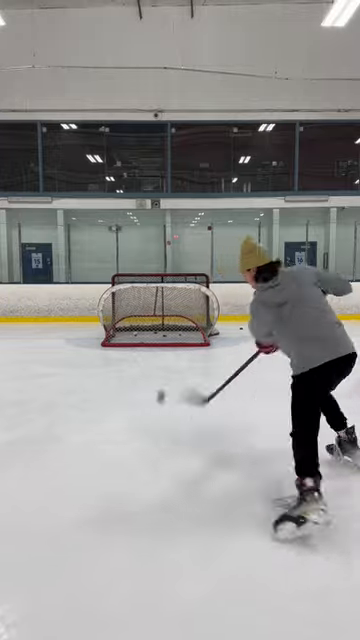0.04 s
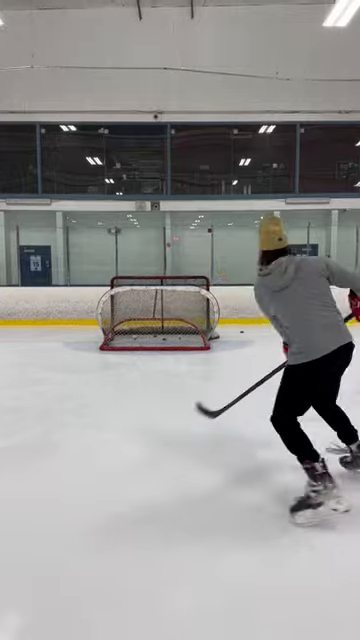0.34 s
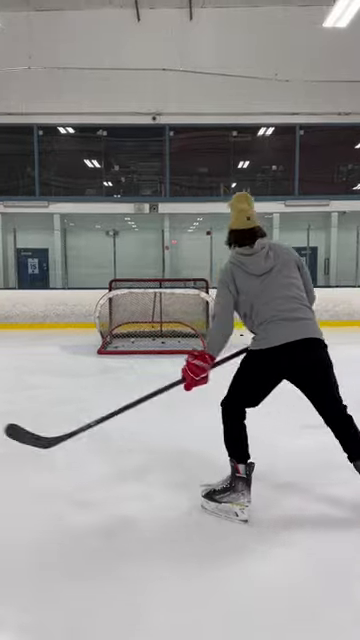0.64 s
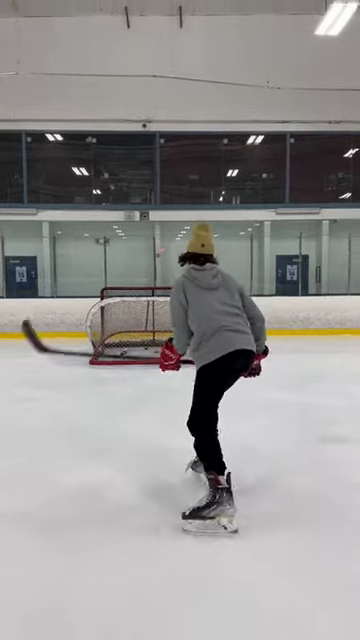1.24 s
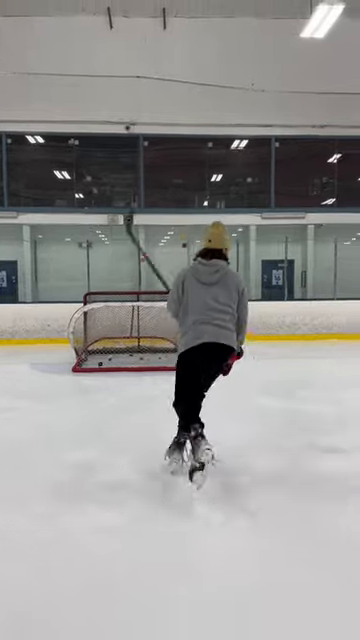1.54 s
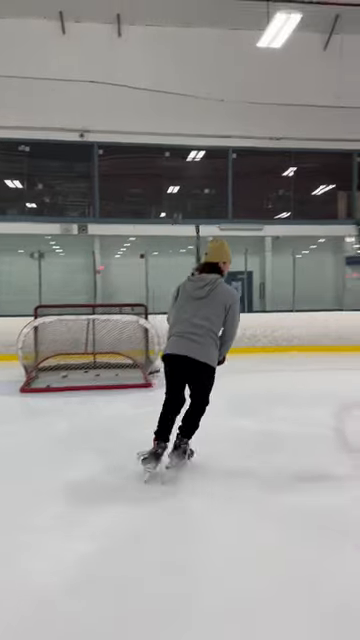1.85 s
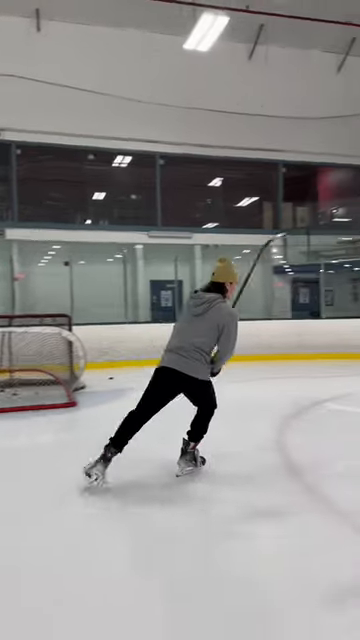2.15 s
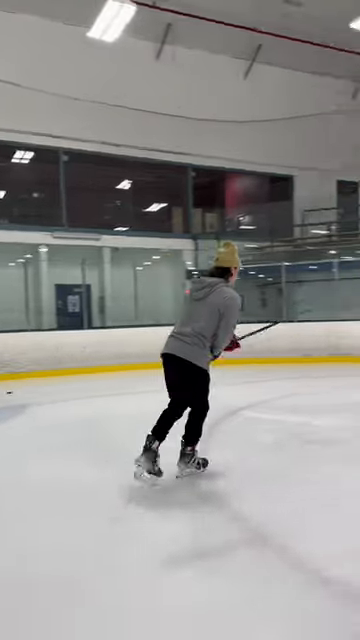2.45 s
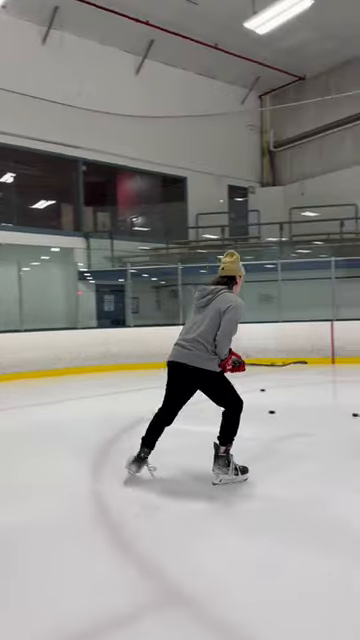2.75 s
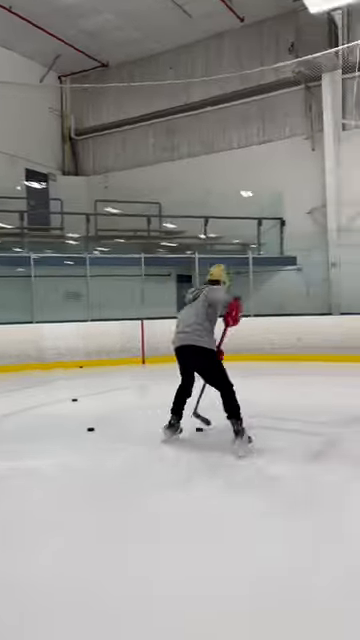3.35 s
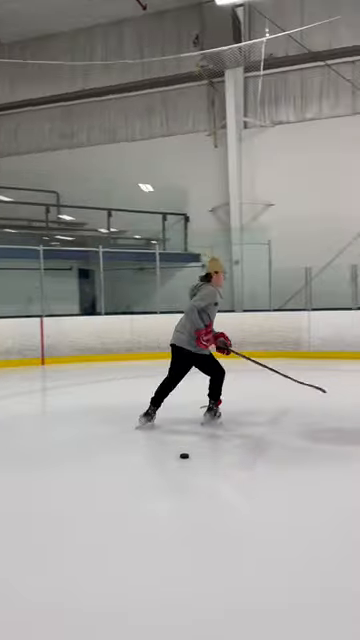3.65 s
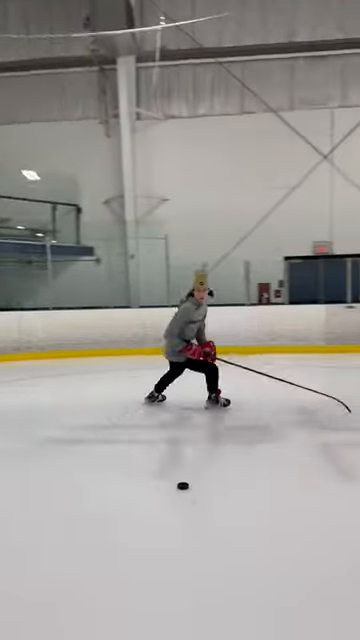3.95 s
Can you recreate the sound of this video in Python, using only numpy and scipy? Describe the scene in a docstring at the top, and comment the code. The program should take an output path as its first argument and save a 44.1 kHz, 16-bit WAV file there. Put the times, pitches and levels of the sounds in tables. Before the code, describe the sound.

A puck hits a steel goal post at about 0.2 seconds with a bright ping, amid bangs on the boards and the echo of a shot. The ringing fades through the rink. From 1.6 seconds skate blades clack and scrape on the ice. A stick snaps another puck at about 3.2 seconds, and skating continues to 4 seconds as a low machinery hum grows louder.

```python
"""Puck off the post in an ice rink

A hard shot is still echoing when the puck sets the steel goal post ringing and bangs into the boards.
The ping reflects from the far walls while the player skates off, blades clacking on the ice and
chipping it, and snaps a second puck away with the stick. Each impact excites the hall's reverberation.
The rink's machinery hums underneath, louder as the player moves on."""
import sys
import numpy as np
from scipy import signal
from scipy.fft import rfft, irfft
from scipy.io import wavfile

SR = 44100
rng = np.random.default_rng(int(sys.argv[2]) if len(sys.argv) > 2 else 0)


def dump_mix(stems):
    """Bounce the given channels to the path in sys.argv[1] as a 16-bit WAV at rate SR."""
    frames = np.atleast_2d(stems).T  # one column per channel
    limited = np.clip(frames, -1, 1)  # hard clip at full scale
    pcm = np.round(limited * 32767).astype(np.int16)
    wavfile.write(sys.argv[1], SR, pcm)


N = 176400
T = np.arange(N) / SR

# modes of the steel post: f/Hz, level/dB, T60/s
POST_MODES = [(744, -24, 2.0), (1060, -28, 1.2), (1324, -22, 1.0), (1572, -28, .9), (2019, -21, .6),
              (2157, -7, .22), (2248, 0, .23), (2287, -7, .25), (2677, -24, .4), (6308, -12.5, .12),
              (6344, -16, .12)]
# scattering by glass and boards: delay/s, decay time/s, level/dB
POST_SCATTER = [(.012, .04, -15)]
# wall echoes: delay/s, level/dB
POST_ECHOES = [(.123, -4), (.368, -11), (.395, -11), (.435, -13), (.487, -17), (1.83, -28)]
def goal_post(hall, strike_s=.2325, echo_cutoff_hz=2600):
    """Free vibration: the struck tube rings in its modes, and the walls reflect a duller ping."""
    ping = delayed(from_db(-17.5) * ring(POST_MODES, T), strike_s)
    flutter = scattered(ping, POST_SCATTER)
    far = dull(ping + flutter, echo_cutoff_hz)
    echoes = sum(from_db(db) * delayed(far, s) for s, db in POST_ECHOES)
    # the ping swells faintly again about 1.6 s after the blow
    late_response = from_db(-25.5) * rms_one(rng.standard_normal(N) * swell(1.59, .23)) / np.sqrt(N)
    late_swell = signal.fftconvolve(far, late_response)[:N]
    tail = reverberation(dull(ping, echo_cutoff_hz), hall, wet_db=-1)
    return direct(ping + flutter + echoes + late_swell) + tail


# ticks: t/s, half-width/s, level/dB
TICKS = [(0.2325, 0.002, -41.5), (.434, .0006, -41.5), (1.6006, 0.00092, -52)]
# their spectrum: f/Hz, level/dB
TICK_SPECTRUM = [(3000, -15), (7000, -1), (15000, -16)]
def ticks():
    """Brief transients are broadband: bright, dry ticks, the first as the puck meets the steel."""
    return noise(TICK_SPECTRUM) * bursts(TICKS)


# bangs on boards and glass, and their wall echoes: t/s, level/dB, decay time/s, cutoff/Hz
BANGS = [(.006, -18.5, 0.0059, 9300), (.019, -28.5, 0.0053, 9000), (0.123, -29, 0.034, 4770),
         (0.213, -19.5, 0.0059, 1600), (0.231, -28.5, 0.081, 9100), (0.297, -27.5, 0.023, 2000),
         (0.358, -24.5, 0.021, 3080), (0.414, -28.5, 0.038, 2770), (0.723, -27.5, 0.057, 1090)]
# panel spectrum: f/Hz, level/dB
PANEL_SPECTRUM = [(100, -12), (800, -8.5), (1350, 0), (1900, -10.5), (2700, -5.5), (4200, -17.5),
                  (7500, -20), (11000, -55.5)]
def boards(hall):
    """Damped vibration: distant panels rattle at each bang and decay exponentially."""
    rattle = noise(PANEL_SPECTRUM)
    bangs = sum(dull(rattle * delayed(from_db(db) * np.exp(-T / decay), s), hz)
                for s, db, decay, hz in BANGS)
    return in_hall(bangs, hall, wet_db=1)


# stick meets puck and ice: t/s, level/dB, cutoff/Hz
STICK_HITS = [(3.2243, -17, 2540), (3.2258, -6, 5400), (3.2295, -13, 2040), (3.2368, -19.5, 4000)]
# modes of the stick blade: f/Hz, level/dB, T60/s
STICK_MODES = [(564, -17.5, 0.011), (960, -9.5, 0.013), (1665, -4, 0.0088), (2257, -5, 0.0087),
               (3130, 0.5, 0.002), (4520, -16, 0.0067), (5820, -18, 0.016), (7540, -17.5, 0.012),
               (9250, -15, 0.0032)]
# the blade skims the ice: t/s, half-width/s, level/dB
SKIMS = [(3.190, 0.0043, -37), (3.2377, 0.0017, -29.5)]
# skim spectrum: f/Hz, level/dB
SKIM_SPECTRUM = [(500, -15), (1600, 12), (4000, -5.5), (5800, 3), (8000, 4), (15000, -36)]
# reflections from the boards: delay/s, decay time/s, level/dB
BOARD_SLAPS = [(0.036, 0.012, -9), (0.066, .03, -13.5)]
def stick(hall):
    """Impact excitation: the blade skims the ice and rings against the puck; the boards slap back."""
    knocks = blows(STICK_HITS, STICK_MODES, spread_db=2.5)
    snap = knocks + noise(SKIM_SPECTRUM) * bursts(SKIMS)
    return in_hall(snap, hall, wet_db=-1) + direct(scattered(snap, BOARD_SLAPS))


# a skate edge bites: t/s, half-width/s, level/dB, high-pass cutoff/Hz
SCRAPES = [(1.613, 0.009, -37, 650), (2.035, 0.035, -37.5, 800), (2.485, 0.034, -43, 254),
           (2.716, 0.028, -33, 1340), (3.058, 0.011, -34, 1350), (3.404, 0.025, -38, 590),
           (3.89, 0.06, -34, 614), (3.99, 0.047, -30.5, 353)]
# scrape spectrum: f/Hz, level/dB
SCRAPE_SPECTRUM = [(450, 2), (1500, 0), (2350, -5.5), (3100, -26), (7500, -37), (11000, -60)]
def scrapes(chips_per_s=1000):
    """Brittle fracture: ice chips break off under the edge as random impulses over a hiss."""
    chips = (rng.random(N) < chips_per_s / SR) * rng.choice([-1, 1], N)
    strengths = from_db(2.5 * np.minimum(rng.exponential(1, N), 4))
    hiss = 0.46 * rng.standard_normal(N)
    crunch = rms_one(colour(rms_one(chips * strengths) + hiss, SCRAPE_SPECTRUM))
    return sum(from_db(db) * swell(s, half) * thin(crunch, hz) for s, half, db, hz in SCRAPES)


# a blade is set down: t/s, clack level/dB, cutoff/Hz, thud level/dB
CLACKS = [(1.6, -20.5, 2600, -41), (1.856, -28, 2000, -33), (1.8943, -22.5, 2200, -43),
          (1.9428, -17.5, 1700, -40), (2.437, -18.5, 1600, -28), (2.467, -29, 1800, -36),
          (2.500, -27, 2800, -33), (2.816, -26.5, 4500, -39), (3.011, -20, 3400, -27),
          (3.061, -25.5, 3000, -28), (3.352, -15, 2000, -34), (3.362, -21.5, 2000, -42),
          (3.465, -16.5, 1900, -29)]
# modes of blade holder and boot (clack) and boot alone (thud): f/Hz, level/dB, T60/s
SKATE_MODES = [(650, -8, 0.0056), (827, -5, 0.012), (1293, -7.5, 0.013), (1546, -10.5, 0.015),
               (2160, -14.5, 0.015), (2600, -12.5, 0.0059), (3700, -10.5, 0.0031)]
BOOT_MODES = [(441, 0.013, 0.028)]
def strides(hall, pan_db=0.53):
    """Heavily damped modes: each skate lands with a clack and a thud, amid the scrapes of its edge."""
    clacks = blows([row[:3] for row in CLACKS], SKATE_MODES, spread_db=1.5)
    thuds = sum(delayed(from_db(db) * ring(BOOT_MODES, T), s) for s, _, _, db in CLACKS)
    return in_hall(clacks + thuds + scrapes(), hall, wet_db=-8) * from_db([[pan_db], [-pan_db]])


# glide envelope: t/s, level/dB
GLIDE_LEVEL = [(0, -66.5), (2.2, -59), (2.55, -55.5), (3.7, -51.5), (4, -47)]
# glide spectrum: f/Hz, level/dB
GLIDE_SPECTRUM = [(400, -2), (1500, 15), (4200, 5), (7500, 3), (10000, -9), (12000, -72), (15000, -21)]
def glide():
    """Sliding friction: the blades draw a growing hiss from the ice."""
    return level(GLIDE_LEVEL) * diffuse(GLIDE_SPECTRUM)


# starting spectrum of the earlier shot's tail: f/Hz, level/dB
SHOT_SPECTRUM = [(100, -33), (300, -14), (750, -7), (1330, 1.5), (1800, -5.5), (2600, -5), (4000, -14.5),
                 (7000, -14), (9000, -21), (11000, -54.5)]
def earlier_shot():
    """Reverberant decay: the sound of a hard shot lingers as a diffuse field."""
    return from_db(-31) * dying(diffuse(SHOT_SPECTRUM))


# ventilation spectrum: f/Hz, level/dB
AIR_SPECTRUM = [(20, -38), (45, 0), (184, -3.5), (532, -8), (1350, -17.5), (2250, -23.5), (4000, -39),
                (9000, -73)]
# partials of the low drone and the higher mains hum: f/Hz, level/dB, waver depth (0-1)
DRONE_PARTIALS = [(74.4, -2, 0.78), (90.2, -6, 0.66), (119.7, -7.5, 0)]
HUM_PARTIALS = [(240.1, -1, 0.14), (296.8, -15.5, 1)]
# envelopes of the three: t/s, level/dB
AIR_LEVEL = [(1.4, -45), (2.6, -44), (3.5, -41), (4, -39)]
DRONE_LEVEL = [(0, -52), (1.3, -48.5), (2.8, -46.5), (3.5, -38), (4, -38)]
HUM_LEVEL = [(0, -49.5), (1.6, -49.5), (2.0, -42), (3.0, -39.5)]
def machinery():
    """Superposition: the plant's broadband air rush adds to its tonal drone and mains hum."""
    air = level(AIR_LEVEL) * diffuse(AIR_SPECTRUM)
    drone = level(DRONE_LEVEL) * tones(DRONE_PARTIALS)
    hum = level(HUM_LEVEL) * tones(HUM_PARTIALS)
    return air + drone + hum


# reverberation time of the hall: f/Hz, T60/s
HALL_T60 = [(150, 2.2), (750, 7.16), (1400, 3.86), (2500, 3.89), (4500, 1.8), (8000, 1.07)]
def dying(x):
    """Absorption depends on frequency: each half-octave decays at its own rate."""
    spectrum, f = rfft(x), np.fft.rfftfreq(N, 1 / SR)
    centres = np.geomspace(150, 9600, 13)
    bands = (irfft(spectrum * at_hz(np.c_[centres, share], f), N) for share in np.eye(len(centres)))
    return sum(band * from_db(-60 * T / at_hz(HALL_T60, hz)) for hz, band in zip(centres, bands))


def hall_response(build_s=0.0038):
    """Impulse response of the hall: a diffuse field builds up quickly, then decays."""
    field = dying(diffuse([(6000, 5), (14000, -13)])) * (1 - np.exp(-T / build_s))
    return from_db(-4.5) * rms_one(field) / np.sqrt(N)


def reverberation(x, hall, wet_db):
    """Convolution with the hall's impulse response gives a sound its tail."""
    return from_db(wet_db) * signal.fftconvolve(x[None], hall, axes=1)[:, :N]


def in_hall(x, hall, wet_db):
    """Direct and reverberant fields add."""
    return direct(x) + reverberation(x, hall, wet_db)


def scattered(x, rows):
    """Scattering: dense clusters of reflections, each decaying after its delay."""
    envelope = sum(delayed(from_db(db) * np.exp(-T / decay) * np.sqrt(2 / (decay * SR)), s)
                   for s, decay, db in rows)
    return signal.fftconvolve(x, rng.standard_normal(N) * envelope)[:N]


# stereo width of diffuse sound: f/Hz, side-to-mid level/dB
DIFFUSE_WIDTH = [(250, -25), (700, -8), (1100, -9.5), (1800, -14.5), (2800, 1.5), (5500, -5), (9000, 0),
                 (11000, 25)]
def diffuse(spectrum):
    """Diffuse field: noise from all around is partly coherent between channels."""
    mid, side = rms_one(colour(rng.standard_normal((2, N)), spectrum))
    return mid + colour(side, DIFFUSE_WIDTH) * [[1], [-1]]


# stereo width of a source ahead: f/Hz, side-to-mid level/dB
DIRECT_WIDTH = [(2150, -27), (3000, -5.5), (7000, -5.5), (11000, 19.5)]
def direct(x):
    """Phase difference: a side signal in quadrature parts the channels towards the treble."""
    return x + colour(x, DIRECT_WIDTH, 1j) * [[1], [-1]]


def ring(modes, t, spread_db=0):
    """Modal superposition: damped sinusoids of alternating sign, levels varied by spread_db."""
    offsets_db = spread_db * rng.standard_normal(len(modes))
    return sum((-1) ** k * from_db(db + offsets_db[k] - 60 * t / t60) * np.sin(2 * np.pi * hz * t)
               for k, (hz, db, t60) in enumerate(modes))


def blows(rows, modes, spread_db):
    """Contact acts as a low-pass filter: softer knocks on a body are duller."""
    return sum(delayed(from_db(db) * dull(ring(modes, T[:SR // 8], spread_db), hz), s)
               for s, db, hz in rows)


def tones(partials):
    """Random modulation: steady tones waver in amplitude and phase."""
    total = np.zeros(N)
    for hz, db, waver in partials:
        modulation = 1 + waver * (drift(9) + 1j * drift(6.2))
        carrier = np.exp(2j * np.pi * (hz * T + rng.random()))
        total += from_db(db) * np.real(modulation * carrier)
    return direct(total)


def drift(knots_per_s):
    """Slow fluctuation between Gaussian random values."""
    knots = rng.standard_normal(400)
    return np.interp(T * knots_per_s, np.arange(len(knots)), knots)


def swell(s, half):
    """Gaussian envelope centred on time s."""
    return np.exp(-((T - s) / half) ** 2)


def bursts(rows):
    """Sum of Gaussian envelopes."""
    return sum(from_db(db) * swell(s, half) for s, half, db in rows)


def level(rows):
    """Gain over time, interpolated in decibels."""
    return from_db(np.interp(T, *np.transpose(rows)))


def delayed(x, s):
    """Pure delay of s seconds."""
    return np.pad(x, (max(int(s * SR), 0), N))[:N]


def noise(spectrum):
    """Filtered Gaussian noise of unit rms."""
    return rms_one(colour(rng.standard_normal(N), spectrum))


def colour(x, points, phasor=1):
    """Spectral shaping; the phasor rotates the phase."""
    gain = from_db(at_hz(points, np.fft.rfftfreq(2 * N, 1 / SR)))
    return irfft(rfft(x, 2 * N) * phasor * gain)[..., :N]


def at_hz(points, hz):
    """Interpolation on a log-frequency axis."""
    f, values = np.transpose(points)
    return np.interp(np.log(hz + 1e-9), np.log(f), values)


def dull(x, cutoff_hz):
    """Second-order low-pass."""
    return signal.sosfilt(signal.butter(2, cutoff_hz, fs=SR, output="sos"), x + 1e-18)


def thin(x, cutoff_hz):
    """Second-order high-pass."""
    return signal.sosfilt(signal.butter(2, cutoff_hz, "high", fs=SR, output="sos"), x)


def from_db(db):
    """Decibels to amplitude ratio."""
    return 10 ** (np.asarray(db) / 20)


def rms_one(x):
    """Normalisation to unit rms."""
    return x / np.sqrt(np.mean(x ** 2) + 1e-20)


def scene():
    """Linear superposition of all sources in one hall."""
    hall = hall_response()
    first_shot = earlier_shot() + goal_post(hall) + ticks() + boards(hall)
    player = strides(hall) + glide() + stick(hall)
    return first_shot + player + machinery()


def record(dry):
    """Band limiting: a steep low-pass removes everything above 17 kHz."""
    return signal.sosfilt(signal.cheby2(12, 70, 17000, fs=SR, output="sos"), dry)


dry = scene()
out = record(dry)
dump_mix(out)
```